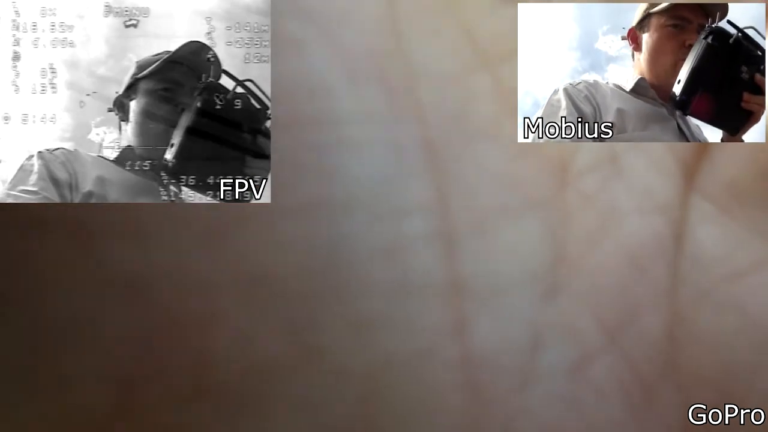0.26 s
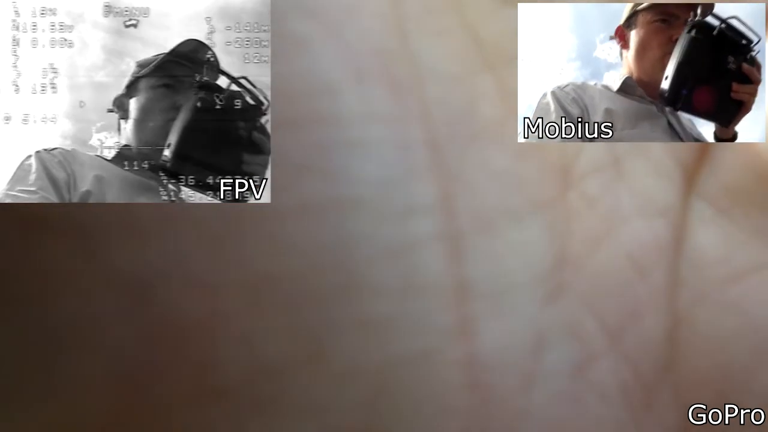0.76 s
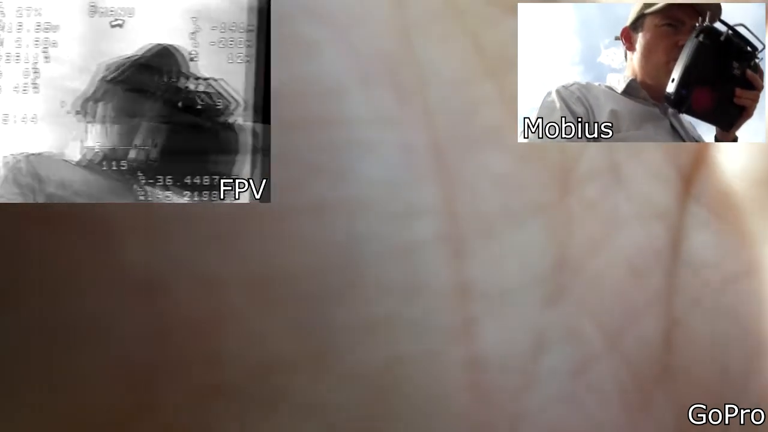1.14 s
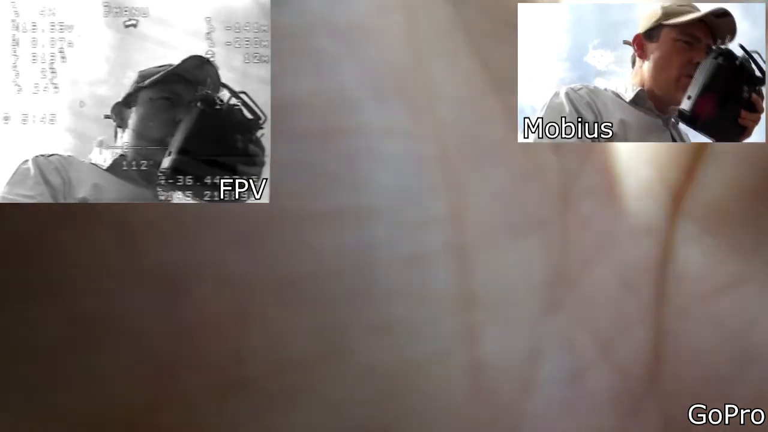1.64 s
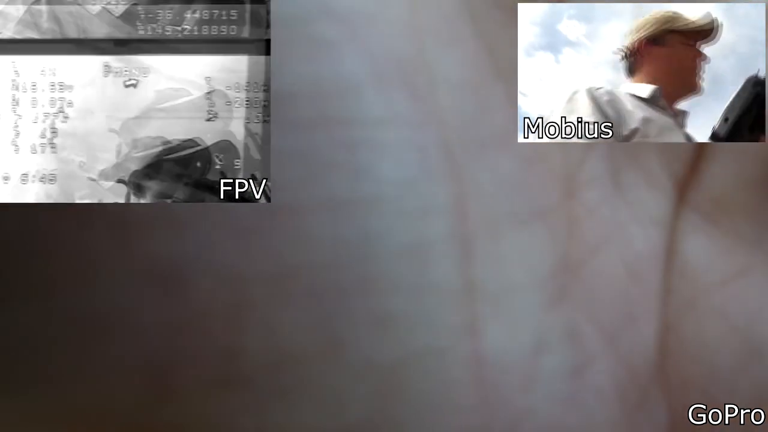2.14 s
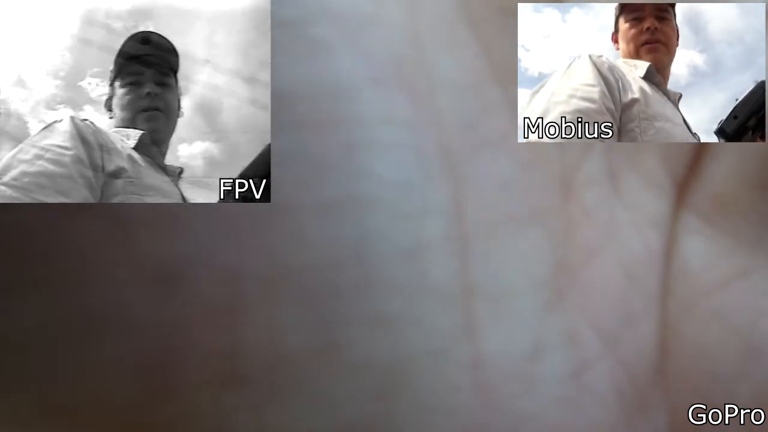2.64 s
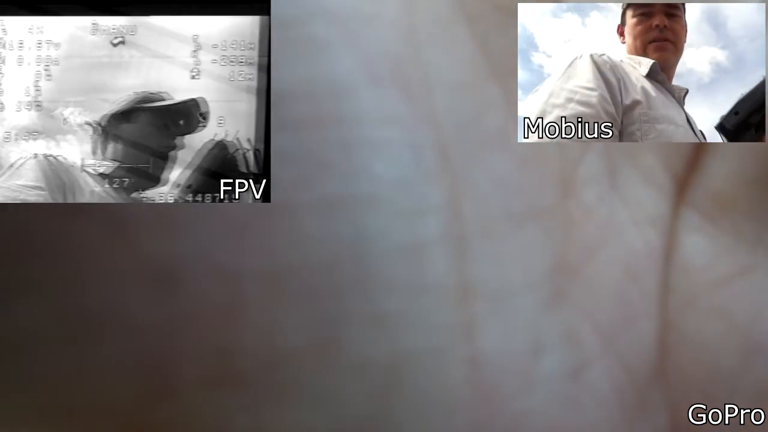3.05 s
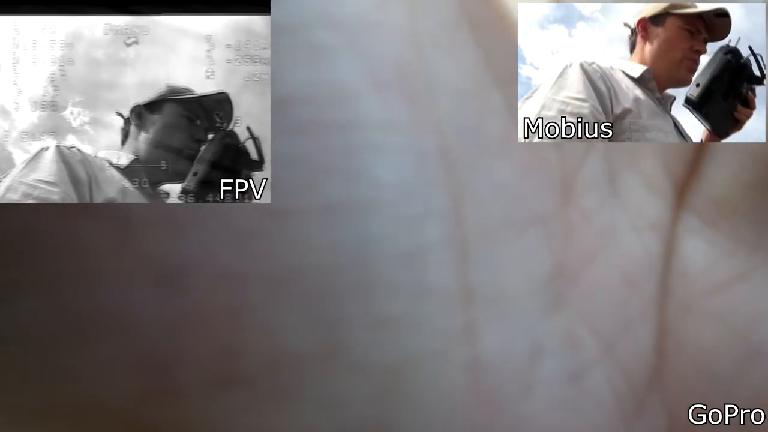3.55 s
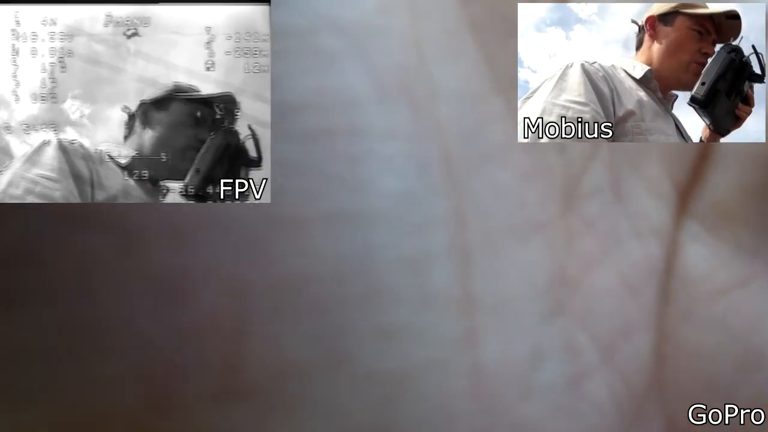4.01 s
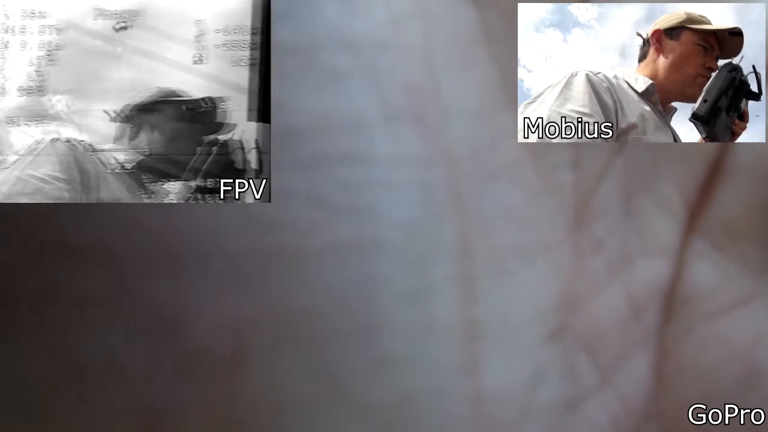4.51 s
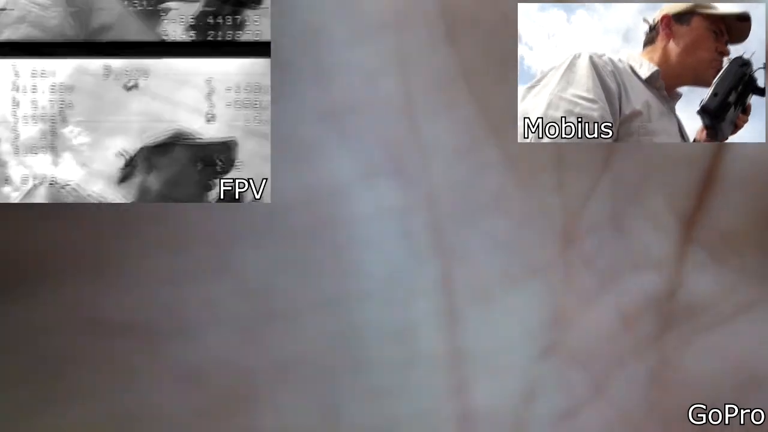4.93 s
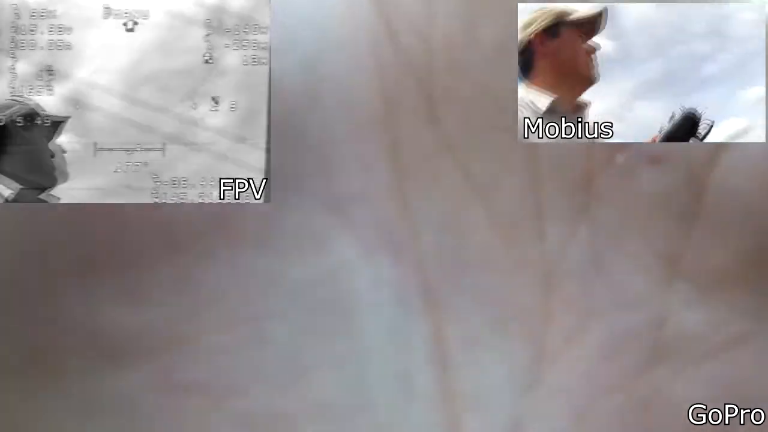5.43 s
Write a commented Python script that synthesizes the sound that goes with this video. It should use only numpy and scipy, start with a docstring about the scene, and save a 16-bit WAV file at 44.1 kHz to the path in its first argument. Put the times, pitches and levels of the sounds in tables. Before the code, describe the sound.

A microphone sits on the body of a small electric model plane outdoors, with low, quiet air noise. At first a hand bumps and shifts dully on the airframe while a thin, distant, rapidly repeated falling chirp sounds until about 0.35 s. At 0.5 s the motor stutters, buzzing and ticking ever faster with hard jerking knocks; it catches near 0.7 s with a quick rising whine and a short propeller whirr. From about 0.95 s it coasts, wavering metallic tones sliding downward and dissolving into soft grinding by about 2.5 s. Faint skin rubs pass around 2 to 3 s. From 3 to 4.3 s servo gears chatter in small dry knocks, densest after 3.4 s. At 4.35 s the motor jerks and stutters again, catches at 4.7 s and whines steeply up into a loud, rasping propeller buzz, nearly steady in pitch, overloading on peaks and swelling after 5.2 s until the cut.

```python
"""Model plane motor, close on the airframe

Microphone on the airframe of a model plane: its brushless motor twice stutters into motion and whines up.
First comes a blip of throttle that coasts down on singing bearings, then a longer burst with a buzzing propeller.
Motor and propeller are tones at multiples of the shaft speed with chopped noise; loud peaks overload the microphone.
In between, servo gears chatter as short noise bursts; a hand bumps and rubs the airframe as shaped noise.
Far off, a short falling chirp repeats at the opening, over steady outdoor noise."""
import sys
import numpy as np
from scipy import signal
from scipy.fft import rfft, irfft
from scipy.io import wavfile
from scipy.ndimage import uniform_filter1d

SR = 44100
rng = np.random.default_rng(int(sys.argv[2]) if len(sys.argv) > 2 else 0)


def materialize(psi):
    """Save the field psi as 16-bit PCM at rate SR to the path in sys.argv[1].

    A 1-D psi becomes a single channel; in a 2-D psi each row is a channel.
    """
    bounded = np.clip(np.atleast_2d(psi).T, -1, 1)
    quanta = np.round(bounded * 32767).astype(np.int16)
    wavfile.write(sys.argv[1], SR, quanta)


N = 250267
TIME = np.arange(N) / SR
BINS = np.fft.rfftfreq(N, 1 / SR)

# Levels in the tables are relative; the functions may add offsets or normalise.
# shaft speed during the blip of throttle [t/s, speed/turns per s]
BLIP = [(.68, 22), (.7, 26.5), (.72, 33), (.745, 47.6), (.76, 57), (.8, 67.5), (.85, 74), (.91, 76),
        (.97, 73.4)]
# stuttering starts [first kick t/s, rotor catches t/s, thud level/dB, tick level/dB, thud surge at the catch/dB]
STARTS = [(0.498, 0.709, -33.5, -44, 16), (4.344, 4.684, -34, -44.5, 2.5)]
# the rotor jerks [t/s, level/dB, length/s, crack level over the blow/dB]
JERKS = [(0.497, -26.5, 0.0075, -14), (0.517, -22.5, 0.0082, -18), (0.531, -20, 0.003, -27),
         (0.647, -15.5, 0.0024, -7.5), (0.655, -8, 0.0018, -17), (4.35, -30.5, 0.0021, -5.5),
         (4.376, -29, 0.0035, -4), (4.428, -21, 0.0051, -30), (4.483, -7.5, 0.0035, -5.5),
         (4.615, -39, 0.0029, 6.5)]
# the rising whine dips, at pitches where the airframe responds weakly [t/s, length/s]
DIPS = [(0.733, 0.0073), (0.752, 0.0031), (4.694, 0.0029), (4.714, 0.01), (4.747, 0.0024), (4.766, 0.0025),
        (4.787, 0.0068)]
# spectrum of the winding ticks [f/Hz, level/dB]
TICK_COLOUR = [(1500, -14), (2300, 2), (2900, -11.5), (3400, 6.5), (3900, 1.5), (4350, -14), (4950, 10.5),
               (5400, -3), (6400, 3), (7100, -18.5), (8000, -24), (15000, -27)]
# whine of the windings [rotor catches t/s, load eases t/s, level/dB, surge at the catch/dB]
WHINE = [(.71, .94, -30, 11.5), (4.685, 4.872, -21, 5.5)]
# orders of the whine [multiple of the shaft speed, level/dB]
WHINE_ORDERS = [(14, -19), (21, -15), (28, -24), (35, -22), (42, 0), (49, -22), (63, -11), (84, -6),
                (126, -28)]
# the controller's switching tone at part throttle [from t/s, to t/s, f/Hz, level/dB]
SWITCHING = [(.669, 1.01, 7740, -48.5), (4.609, 4.698, 7750, -53)]
# singing bearings and magnets [multiple of the shaft speed, level/dB, relative width]
COAST_ORDERS = [(4, -14, .01), (7, -16, .01), (10, -14, .02), (18, -15, .015), (12, -9, .01),
                (13, -7, .008), (14, 0, .004), (24.4, -10, .015), (26, -9, .015), (28, -2, .008),
                (35.6, -6, .01), (36.6, -1, .008), (42, 0, .004), (48.6, -10, .01), (55.4, -12, .012),
                (69, -21, .02), (83, -22, .02)]
# spectrum the coasting tones pass through [f/Hz, level/dB]
COAST_COLOUR = [(70, -22), (120, 0.5), (165, -25), (240, -20), (310, -7.5), (420, -1.5), (600, 6.5),
                (750, 1.5), (1000, 3), (1450, 7), (1800, -5), (2500, -10), (3200, -40), (6000, -12)]
# spectrum of the grinding while coasting [f/Hz, level/dB]
GRIND = [(59, -54), (100, -54), (252, -23.5), (399, -0.5), (462, -12), (582, 1), (646, -1.5), (1110, -2),
         (1240, -12), (1430, -6), (1960, -25), (5040, -37), (15000, -59)]
# propeller tones in the burst [multiple of the shaft speed, level/dB]
BLADE_ORDERS = [(1, -11.5), (2, 3.5), (3, 1), (4, -2), (5, -13), (6, 3), (7, -11.5), (8, 0), (9, -36),
                (10, -10.5), (11, -29), (12, -12), (13, -26), (14, -14), (15, -38), (16, -11.5), (17, -30),
                (18, -10), (19, -29), (20, -8.5), (21, -27), (22, -9), (23, -43), (24, -12.5), (25, -37),
                (26, -15.5)]
# spectrum of the air rasp at low speed [f/Hz, level/dB]
SLOW_AIR = [(35, -35), (60, -8), (145, -19), (179, -42), (285, 4.5), (327, -6), (953, -1.5), (1120, -1),
            (1670, -6.5), (4740, -8.5), (5450, -18), (6260, -15), (15500, -44.5)]
# spectrum of the air rasp at high speed [f/Hz, level/dB]
FAST_AIR = [(40, -5.5), (150, -26.5), (400, -5), (1000, -1.5), (1450, 2), (2000, -1), (2600, -4.5),
            (3300, 1.5), (4100, 7), (4900, 0), (6300, -3.5), (8000, -11), (11000, -20), (15500, -45)]
# ringing modes of the airframe [f/Hz, width/Hz, level/dB]
AIRFRAME = [(332, 23, 3), (428, 13.7, 12), (574, 190, 11), (732, 70, 13), (946, 153, 11.5),
            (1220, 270, 6.5), (1387, 27, 16.5), (1860, 120, -3), (2080, 260, -0.5), (3307, 73, 12),
            (3845, 84, 5), (4750, 410, 1), (5680, 180, 6.5), (6500, 370, -79), (7900, 500, -58),
            (10500, 1500, -47), (12600, 1500, -42)]
# servo twitches [t/s, gear knock level/dB, treble buzz level/dB]
SERVOS = [(3.002, -35.5, -71), (3.047, -35.5, -57), (3.115, -38.5, -61), (3.188, -39, -57.5),
          (3.264, -40, -66), (3.369, -41, -58), (3.398, -42, -58), (3.455, -39, -50), (3.473, -30, -49),
          (3.49, -30.5, -51), (3.545, -37, -52.5), (3.603, -32, -45), (3.626, -35, -50.5),
          (3.672, -28.5, -55), (3.699, -34, -56), (3.719, -42, -56), (3.749, -33, -54.5), (3.779, -30, -58),
          (3.809, -30, -55), (3.878, -29, -59), (3.916, -28, -53), (3.934, -30, -50), (3.949, -29.5, -58),
          (4.002, -39, -56), (4.041, -29, -55), (4.059, -35, -59), (4.126, -34.5, -56.5), (4.169, -38, -60),
          (4.267, -42, -70)]
# spectrum of the servos [f/Hz, level/dB]
SERVO_COLOUR = [(150, -14), (280, -12), (410, -1.5), (650, -8.5), (920, 0), (1350, -11), (2000, -17.5),
                (2900, -24.5), (3450, -21.5), (4100, -31), (4600, -41.5), (6200, -47), (6900, -43),
                (8000, -58), (15000, -67)]
# spectrum of the hand's dull contact [f/Hz, level/dB]
HAND_COLOUR = [(15, -39), (25, -11.5), (157, -9), (357, -15), (401, -20.5), (649, -25.5), (728, -33),
               (779, -24), (2630, -56.5), (6000, -68), (7800, -92), (13200, -120)]
# the hand bumps the airframe [t/s, level/dB]
BUMPS = [(.052, -36.5), (.08, -39), (0.091, -33.5), (0.343, -36.5)]
# skin slides over the airframe [from t/s, to t/s, level/dB]
RUBS = [(0.386, 0.408, -73), (1.93, 2.07, -62.5), (2.237, 2.28, -71), (2.53, 2.761, -69),
        (2.944, 3.077, -73)]
# skin snags on the airframe [t/s, level/dB]
SNAGS = [(1.976, -41), (2.075, -52), (2.76, -53)]
# spectrum of the skin [f/Hz, level/dB]
RUB_COLOUR = [(1500, 0), (3200, -3.5), (4200, -1.5), (5600, -2.5), (7500, -16), (10500, -16), (15000, -35)]
# spectrum of the outdoor background [f/Hz, level/dB]
OUTDOORS = [(15, -38), (25, -8), (125, -3), (186, -13), (243, -10.5), (415, -16.5), (729, -12.5),
            (811, -26.5), (1420, -17.5), (1720, -35.5), (15000, -47)]

STEPS, BLADES = 42, 2  # per turn
# coasting: time scale of the air drag (s), and dry friction as a speed offset (turns per s)
DRAG_S, FRICTION = .935, 21.7
# the burst climbs an S-curve from catch to top speed (turns per s), and sags with the battery
BURST_S, CLIMB_S, CLIMB_SHAPE, CATCH_SPEED, TOP_SPEED, SAG_PER_S = 4.6565, .1683, 1.738, 21, 187.3, 3.15
# the kicks quicken steadily, then race as the rotor catches
FIRST_KICKS_PER_S, KICK_RAMP_PER_S2, RACE_KICKS_PER_S, RACE_S = 118, 850, 520, .03
# the rotor rocks hardest shortly after the first kick
ROCK_AFTER_S, ROCK_WIDTH_S, ROCK_THUD_DB, ROCK_TICK_DB = 0.074, 0.047, 9, 9
WHINE_LEAD_S, WHINE_SURGE_S, WHINE_FADE_DB_PER_S = 0.038, 0.028, 43
# loudness follows speed: level (dB), knee speed (turns per s), fall below the knee (dB per octave)
SHAKE_DB, SHAKE_KNEE, SHAKE_FALL_DB = -29, 81.3, 28
SLOW_RASP_DB, SLOW_RASP_KNEE, SLOW_RASP_FALL_DB = -31.5, 52.9, 26
BEARINGS_DB, BEARINGS_KNEE, BEARINGS_FALL_DB = -30.5, 31.9, 11.5
BLADES_DB, BLADES_KNEE, BLADES_FALL_DB = -31.5, 106, 8
FAST_RASP_DB, FAST_RASP_KNEE, FAST_RASP_FALL_DB = -23.5, 208, 5.5
# the buzz swells as the plane is moved
SWELL_FROM_S, SWELL_TO_S, SWELL_TONES_DB, SWELL_RASP_DB = 5.17, 5.49, 5, 2.5
TWITCH_S, TWITCH_RISE_S = 0.01, 0.0017
# the servos hunt with small random twitches, and whirr while the sticks move
HUNT_FROM_S, HUNT_TO_S, HUNT_DB = 3.0, 3.8, -49
WHIRR_FROM_S, WHIRR_TO_S, WHIRR_DB = 3.35, 4.023, -49
# the hand rests on the airframe until just before the motor starts, and shifts its grip once
REST_UNTIL_S, REST_DB = 0.466, -58.5
SHIFT_FROM_S, SHIFT_TO_S, SHIFT_DB = 0.084, 0.26, -41
SNAG_S = 0.0024
OUTDOORS_DB = -61
# the microphone: overload level (full scale = 1) and upper band edge
CLIP_LEVEL, EDGE_HZ = 0.187, 15600


def blip_speed():
    """Turns per second: the shaft follows the blip of throttle, then drag and friction slow it."""
    coasted = np.maximum(TIME - BLIP[-1][0], 0)
    slowed = (curve(BLIP) + FRICTION) / (1 + coasted / DRAG_S) - FRICTION
    return np.maximum(slowed, 1)


def burst_speed():
    """Turns per second in the long burst: an S-shaped climb, then a slow sag."""
    age = np.maximum(TIME - BURST_S, 0)
    still_to_climb = (TOP_SPEED - CATCH_SPEED) * np.exp(-(age / CLIMB_S) ** CLIMB_SHAPE)
    return TOP_SPEED - still_to_climb - SAG_PER_S * age


def stutter(start, catch, thud_db, tick_db, surge_db, jitter=0.044, uneven_db=1.5, rattle=0.14,
            tick_length=0.0018, tick_db_per_octave=10):
    """The controller kicks the rotor ever faster; each kick ticks in the windings and thuds through the airframe."""
    rate = FIRST_KICKS_PER_S + KICK_RAMP_PER_S2 * np.maximum(TIME - start, 0)
    rate += RACE_KICKS_PER_S * np.exp(np.minimum(TIME - catch, 0) / RACE_S)
    count = np.ceil(np.cumsum(rate * (TIME > start) * (1 + jitter * drift(150))) / SR)
    kicks = np.diff(count, prepend=0) * amp(uneven_db * drift(133))
    decay = np.exp(-1 / (tick_length * SR))
    scrape = signal.lfilter([1], [1, -decay], kicks) * rng.standard_normal(N)
    shudder = rng.standard_normal(N)  # loose parts keep trembling between kicks

    body_band = signal.butter(4, [200, 1700], "band", fs=SR, output="sos")
    thud = signal.sosfilt(body_band, airframe(kicks + rattle * scrape + .04 * shudder))
    tick = colour(kicks + .15 * scrape + .012 * shudder, TICK_COLOUR)
    rocking = bell(start + ROCK_AFTER_S, ROCK_WIDTH_S)
    thud_level_db = thud_db + ROCK_THUD_DB * rocking + surge_db * bell(catch, width=0.039)
    tick_level_db = tick_db + ROCK_TICK_DB * rocking + tick_db_per_octave * np.log2(rate / 280)
    thud = steady(thud, size=900) * amp(thud_level_db)
    tick = steady(tick, size=900) * amp(tick_level_db)
    running = held(start, catch + .045, attack=.0006, release=0.034)
    return dips() * running * (amp(-3.5) * thud + amp(-5.5) * tick)


def jerks():
    """The rotor snaps against its mount: a short blow rings the airframe, with a direct crack."""
    blow = bursts([(s, db, length) for s, db, length, crack in JERKS], rise=0.00027)
    snap = bursts([(s, db + crack, length) for s, db, length, crack in JERKS], rise=0.000075)
    cracks = snap * noise([(60, -9.0), (500, 13.0), (5500, -7.0), (8000, -17), (15000, -37)])
    blows = blow * noise([(40, -26), (200, 20.5), (900, 7.5), (2500, -1.0), (9000, -27.5)])
    return amp(-7.5) * airframe(blows) + amp(5) * cracks


def dips():
    """Gain dipping to about a quarter where the rising whine crosses weak airframe responses."""
    return 1 - 0.74 * np.clip(sum(bell(s, length) for s, length in DIPS), 0, 1)


def whine_level(catch, eases, db, surge_db):
    """The current surges as the rotor catches and falls off as it gathers speed."""
    fade_db = WHINE_FADE_DB_PER_S * np.maximum(TIME - catch, 0)
    current_db = db + surge_db * bell(catch, WHINE_SURGE_S) - fade_db
    return amp(current_db) * held(catch - WHINE_LEAD_S, eases, attack=0.027, release=0.0092)


def whine(speed, loudness, rough=0.42):
    """Magnetic pull at every switching step; the pitch climbs slowly between dips and quickly across each."""
    leap = sum((TIME - s) * bell(s, .009) for s, length in DIPS)
    stepped = np.interp(TIME + leap, TIME, speed)
    turns = np.cumsum(stepped * (1 + 0.0037 * drift(136))) / SR
    pull = np.zeros(N)
    for k, db in WHINE_ORDERS:
        treble_loss = 1 + (k * stepped / 7500) ** 10
        pull += amp(db) * np.sin(2 * np.pi * round(k) * turns) / treble_loss
    # the steps beat against the controller's switching tone: sidebands that fall as the motor rises
    switching_hz = SWITCHING[0][2]
    beats = sum(np.sin(2 * np.pi * (switching_hz * TIME - k * STEPS * turns)) for k in (1, 2))
    pull += amp(-7) * beats * np.clip((70 - stepped) / 20, 0, 1)
    # the whine wavers irregularly in level, faster as the shaft speeds up
    pull *= 1 + rough * flutter(6 * turns).real
    return steady(airframe(pull) + 0.05 * pull, size=1400) * loudness * dips()


def switching():
    """The thin tone of the speed controller's switching, flickering in level."""
    tones = sum(np.sin(2 * np.pi * hz * TIME) * amp(db) * held(on, off, attack=.001, release=0.022)
                for on, off, hz, db in SWITCHING)
    return tones * (1 + 0.42 * drift(160))


def coasting(speed, rough=0.81, least_grind=0.074, grind_speed=11):
    """Magnets and bearing balls sing at multiples of the falling speed, over a soft grinding."""
    turns = np.cumsum(speed) / SR
    song = np.zeros(N)
    # each line drifts slowly and also wobbles within every turn
    for k, db, width in COAST_ORDERS:
        waver = 0.62 + rough * flutter(2 * width * k * turns)
        waver = waver + .25 * flutter(4 * turns)
        song += amp(db + read(COAST_COLOUR, k * speed)) * (waver * np.exp(2j * np.pi * k * turns)).real
    # the lines dissolve into grinding as the rotor comes to rest
    share = np.clip(least_grind + 1 / (1 + (speed / grind_speed) ** 5), 0, 1)
    grind = noise(GRIND) * amp(0.68 * drift(70))
    loudness = amp(BEARINGS_DB) * with_speed(speed, BEARINGS_KNEE, BEARINGS_FALL_DB)
    loudness *= held(BLIP[0][0], TIME[-1], attack=0.31, release=1)
    return (np.sqrt(1 - share) * steady(song, size=3000) + np.sqrt(share) * grind) * loudness


def fast_propeller(speed):
    """Blade tones, more ragged the higher they are, pass the fixed resonances of the airframe."""
    rough, rough_per_order, flutter_hz = .11, .02, 45
    turns = np.cumsum(speed * (1 + 0.00091 * drift(26))) / SR
    low, high = np.zeros(N), np.zeros(N)
    for k, db in BLADE_ORDERS:
        k = round(k)
        gain = amp(db + read(FAST_AIR, k * speed) - read(FAST_AIR, k * speed[-1]))
        ragged = 1 + (rough + rough_per_order * k) * flutter(TIME * flutter_hz)
        tone = gain * (ragged * np.exp(2j * np.pi * (k * turns + 0.34 * rng.random()))).real
        if k < 9:
            low += tone
        else:
            high += tone
    swell = np.interp(TIME, [SWELL_FROM_S, SWELL_TO_S], [0, 1])
    hum = low * amp(BLADES_DB + SWELL_TONES_DB * swell) * with_speed(speed, BLADES_KNEE, BLADES_FALL_DB)
    air = rasp(speed, FAST_AIR, blade_depth=.62, shaft_depth=0.062, gust_db=1.34)
    buzz = amp(1.5) * high + amp(-3.0) * air
    buzz *= amp(FAST_RASP_DB + SWELL_RASP_DB * swell)
    buzz *= with_speed(speed, FAST_RASP_KNEE, FAST_RASP_FALL_DB)
    return (hum + buzz) * held(BURST_S + 0.047, TIME[-1], attack=0.013, release=1)


def slow_propeller(speed, slope_db=-2.5):
    """The unbalanced propeller shakes the airframe at twelve orders of the shaft, the lowest most cleanly."""
    rough_per_order = .11
    turns = np.cumsum(speed) / SR
    shake = np.zeros(N)
    for k in range(1, 13):
        ragged = 1 + rough_per_order * k * flutter(TIME * 14)
        shake += amp(slope_db * np.log2(k)) * (ragged * np.exp(2j * np.pi * (k * turns + rng.random()))).real
    tones = unit(shake) * amp(SHAKE_DB) * with_speed(speed, SHAKE_KNEE, SHAKE_FALL_DB)
    air = rasp(speed, SLOW_AIR, blade_depth=.22, shaft_depth=.14, gust_db=0.0)
    air *= amp(SLOW_RASP_DB) * with_speed(speed, SLOW_RASP_KNEE, SLOW_RASP_FALL_DB)
    return (tones + air) * held(BLIP[0][0], TIME[-1], attack=0.13, release=1)


def rasp(speed, air, blade_depth, shaft_depth, gust_db):
    """Turbulent air, chopped each time a blade passes and swelling once a turn."""
    turns = np.cumsum(speed) / SR
    blade_pass = blade_depth * np.cos(2 * np.pi * BLADES * turns)
    chop = unit(np.exp(blade_pass + shaft_depth * np.cos(2 * np.pi * turns)))
    return unit(colour(rng.standard_normal(N) * chop, air)) * amp(gust_db * drift(50))


def airframe(x):
    """The airframe rings: each mode is a decaying cosine, faster to die the wider it is."""
    t = np.arange(4096) / SR
    ring = sum(amp(db) * width * np.exp(-np.pi * width * t) * np.cos(2 * np.pi * hz * t)
               for hz, width, db in AIRFRAME)
    return signal.oaconvolve(x, ring / np.linalg.norm(ring))[:N]


def servos(count=22, knock_db=-5, buzz_db=19, spread_db=3):
    """Gear teeth click in short twitches, each a knock and a buzz, over a low whirr."""
    teeth_per_s, hiss = 900, .35
    teeth = (rng.random(N) < teeth_per_s / SR) * rng.choice([-1., 1.], N)
    gears = steady(unit(teeth) + hiss * rng.standard_normal(N), size=300)
    low = signal.sosfiltfilt(signal.butter(3, 2100, fs=SR, output="sos"), gears)
    knock = bursts([(s, db + knock_db, TWITCH_S) for s, db, _ in SERVOS], TWITCH_RISE_S, shape=2.5)
    buzz = bursts([(s, db + buzz_db, TWITCH_S) for s, _, db in SERVOS], TWITCH_RISE_S, shape=2.5)
    hunts = []
    for when, size in rng.random((count, 2)):
        moment = HUNT_FROM_S + when * (HUNT_TO_S - HUNT_FROM_S)
        hunts.append((moment, HUNT_DB + spread_db * (2 * size - 1), TWITCH_S))
    busy = bursts(hunts, TWITCH_RISE_S, shape=2.5)
    busy += amp(WHIRR_DB) * held(WHIRR_FROM_S, WHIRR_TO_S, attack=0.016, release=0.11)
    drive = colour(low * (knock + busy) + (gears - low) * (buzz + 0.62 * busy), SERVO_COLOUR)
    return 0.53 * drive + 0.2 * airframe(drive)


def hand():
    """Dull bumps and the hiss of skin on the airframe: two shaped noises."""
    dull = amp(REST_DB) * held(0, REST_UNTIL_S, attack=0.00074, release=.015)
    dull += amp(SHIFT_DB) * held(SHIFT_FROM_S, SHIFT_TO_S, attack=0.087, release=0.011)
    dull += bursts([(s, db, .005) for s, db in BUMPS], rise=0.00059)
    skin = sum(amp(db) * held(on, off, attack=0.0025, release=0.0086) for on, off, db in RUBS)
    skin += bursts([(s, db, SNAG_S) for s, db in SNAGS], rise=0.0011)
    return dull * noise(HAND_COLOUR) + skin * noise(RUB_COLOUR) * amp(5.6 * drift(280))


def far_trill(until=.35, chirps_per_s=18.5, top_hz=4050, fall_hz=500, db=-76):
    """A distant bird or insect repeats a short falling chirp."""
    cycle = (TIME * chirps_per_s) % 1
    gate = np.sin(np.pi * np.clip(2 * cycle, 0, 1))  # sounds in the first half of each cycle
    gate *= amp(db) * held(0, until, attack=.001, release=.015)
    return gate * np.sin(2 * np.pi * np.cumsum(top_hz - fall_hz * cycle) / SR)


def outdoors():
    """Steady shaped noise of the open air."""
    return amp(OUTDOORS_DB) * noise(OUTDOORS)


def amp(db):
    """Decibels to amplitude."""
    return 10 ** (np.asarray(db) / 20)


def unit(x):
    """Scales to rms 1."""
    return x / np.sqrt(np.mean(x ** 2) + 1e-20)


def read(points, hz):
    """A spectrum in dB, joined on a log-frequency axis."""
    f, db = np.transpose(points)
    return np.interp(np.log(hz + 1), np.log(f + 1), db)


def curve(rows):
    """The second column of a table at every sample."""
    return np.interp(TIME, *np.transpose(rows)[:2])


def colour(x, points):
    """Filters by a spectrum, keeping the power of white noise."""
    return irfft(rfft(x) * unit(amp(read(points, BINS))), N)


def noise(points):
    """Noise of rms 1 with the given spectrum."""
    return unit(colour(rng.standard_normal(N), points))


def drift(hz):
    """Smooth chance of rms 1, up to about hz."""
    return unit(irfft(rfft(rng.standard_normal(N)) * np.exp(-(BINS / hz) ** 2), N))


def flutter(phase):
    """Smooth complex chance of mean power 1, heading for a new value at each whole step of phase."""
    knots = rng.standard_normal((2, 4096))
    at = np.arange(4096)
    return (np.interp(phase, at, knots[0]) + 1j * np.interp(phase, at, knots[1])) * np.sqrt(3) / 2


def steady(x, size=1500):
    """Evens out the slow level, leaving quick swells; size in samples."""
    power = uniform_filter1d(uniform_filter1d(x ** 2, size), size)
    return x / np.sqrt(abs(power) + 1e-6 * np.mean(x ** 2))


def bursts(rows, rise, shape=0.75):
    """Envelope of bursts given as [t/s, level/dB, length/s]; a larger shape ends them more abruptly."""
    out = np.zeros(N)
    age = TIME[:SR // 4]
    for s, db, length in rows:
        part = out[max(round(s * SR), 0):][:len(age)]
        burst = amp(db) * (1 - np.exp(-age / rise)) * np.exp(-(age / length) ** shape)
        part += burst[:len(part)]
    return out


def held(on, off, attack, release):
    """Attack, hold and release; all in seconds."""
    rising = 1 - np.exp(-np.maximum(TIME - on, 0) / attack)
    return rising * np.exp(-np.maximum(TIME - off, 0) / release)


def bell(s, width):
    """A smooth hump of height 1 around a moment."""
    return np.exp(-((TIME - s) / width) ** 2)


def with_speed(speed, knee, fall_db):
    """Gain near 1 well above the knee speed, falling by fall_db per octave below it."""
    return amp(-fall_db * np.log2(1 + (knee / speed) ** 6) / 6)


def scene():
    """Motor and propeller through both runs, then servos, hand and the open air."""
    blip, burst = blip_speed(), burst_speed()
    starts = sum(stutter(*row) for row in STARTS) + jerks()
    whines = whine(blip, whine_level(*WHINE[0])) + whine(burst, whine_level(*WHINE[1]))
    motor = whines + switching() + coasting(blip)
    propeller = slow_propeller(blip) + fast_propeller(burst)
    return (starts + motor + propeller + servos() + hand() + far_trill() + outdoors())[None]


def record(dry):
    """The microphone overloads with a firm knee; then the band limit."""
    clipped = dry / (1 + (dry / CLIP_LEVEL) ** 6) ** (1 / 6)
    low_pass = signal.firwin(511, EDGE_HZ, window=("kaiser", 9), fs=SR)
    return signal.oaconvolve(clipped, low_pass[None], "same")


dry = scene()
out = record(dry)
materialize(out)
```